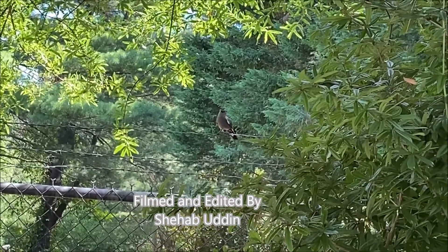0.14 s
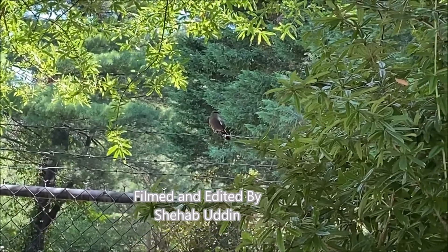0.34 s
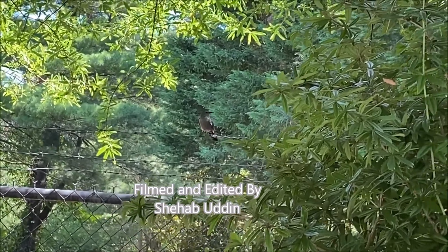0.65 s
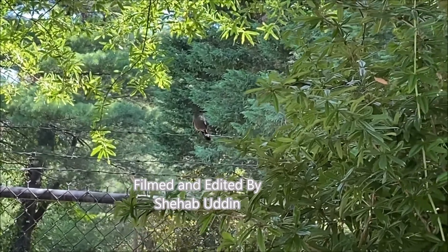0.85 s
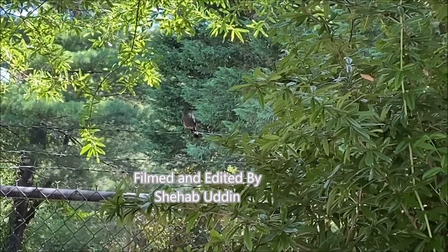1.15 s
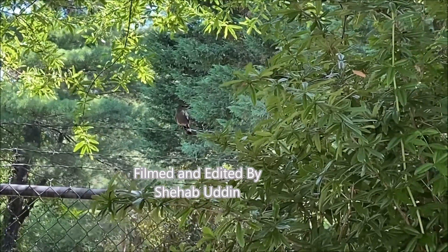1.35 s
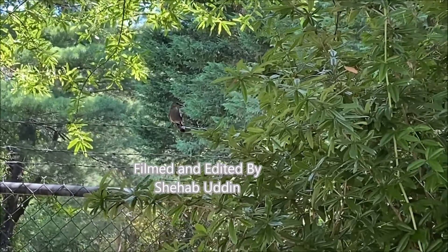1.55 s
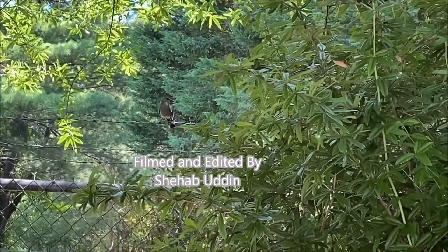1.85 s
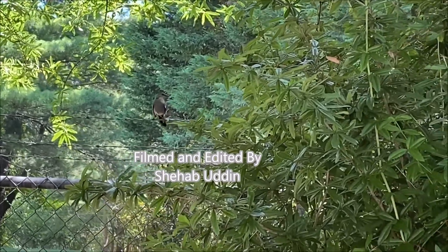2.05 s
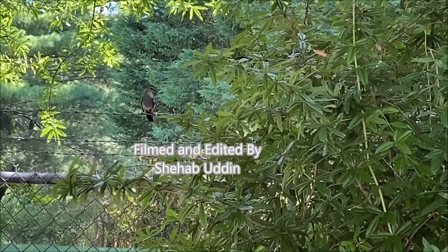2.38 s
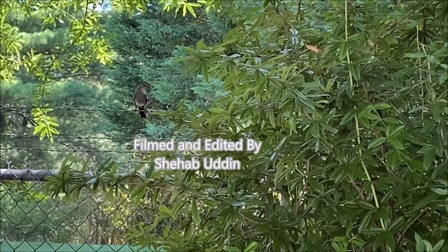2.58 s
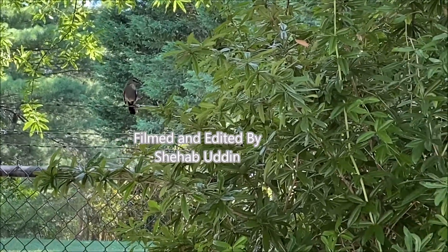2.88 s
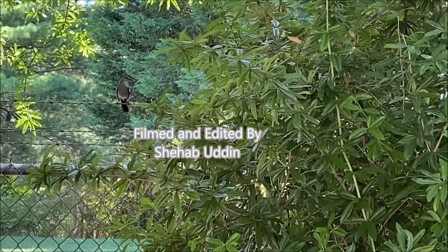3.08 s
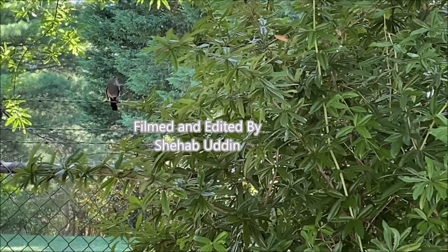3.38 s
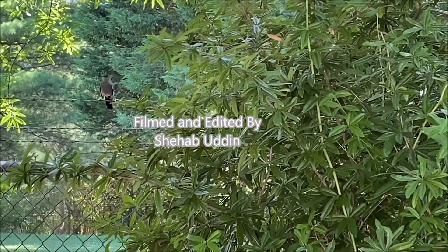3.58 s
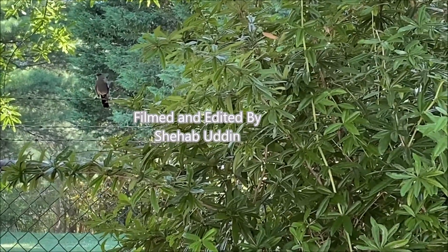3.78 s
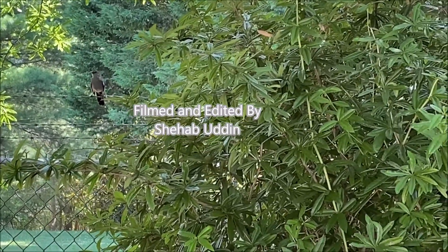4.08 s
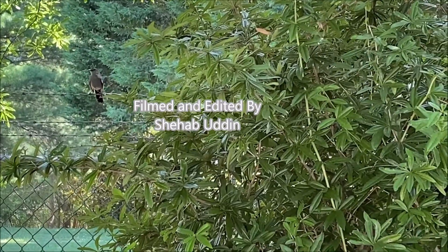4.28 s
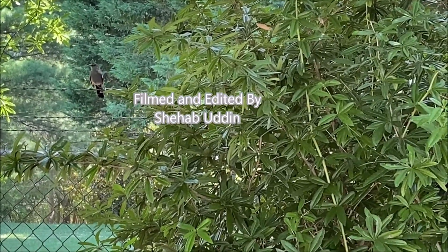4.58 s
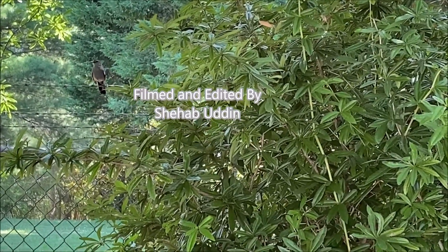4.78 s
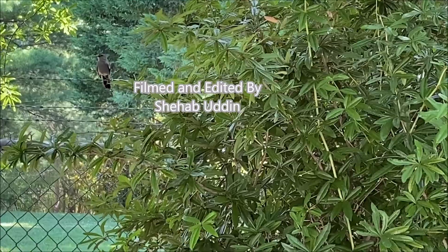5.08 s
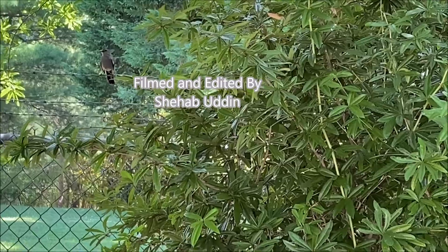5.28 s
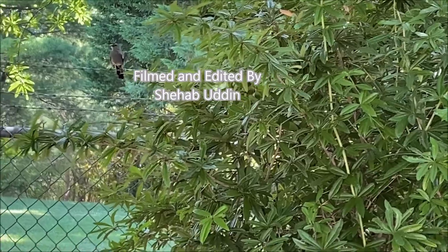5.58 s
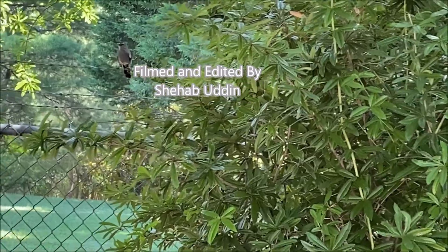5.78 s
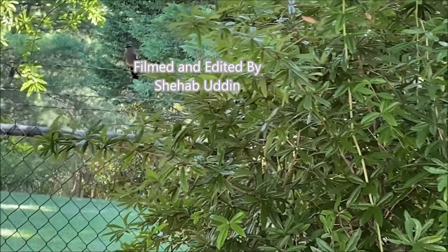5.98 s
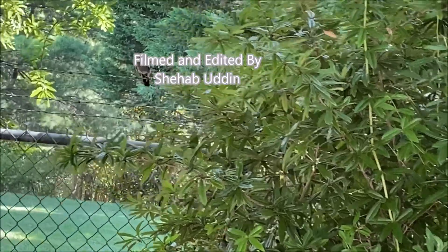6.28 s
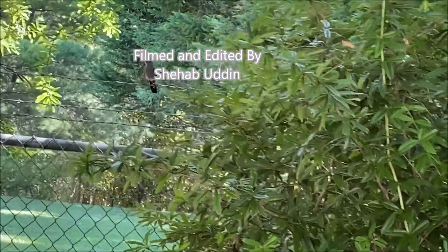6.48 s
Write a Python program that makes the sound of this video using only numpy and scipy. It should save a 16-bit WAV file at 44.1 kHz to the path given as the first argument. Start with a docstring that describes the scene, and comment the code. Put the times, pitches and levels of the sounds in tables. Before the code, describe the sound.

Several small songbirds chirp, whistle and trill in a leafy backyard. Their notes are very brief and slide up or down, scattered at first and more crowded in the second half, with high squeaks and one faint nasal mew. Each call has a slight outdoor echo. Other birds call faintly far off, and a low rumble of distant traffic and a soft hiss continue underneath.

```python
"""A leafy backyard, where songbirds chirp, whistle and trill in quick phrases and one gives a thin nasal mew.
Each note is a nearly pure oscillation of the syrinx, gliding in pitch and roughened by modulation.
Leaves and fence scatter the notes into a short reverberant tail. Other birds call far off, leaves
rustle once and an insect rasps, over the rumble of distant traffic and a soft outdoor hiss.
The sound is received at two microphone ports."""
import sys
import numpy as np
from scipy import signal
from scipy.fft import rfft, irfft
from scipy.io import wavfile
from scipy.ndimage import uniform_filter1d

SR = 44100
rng = np.random.default_rng(int(sys.argv[2]) if len(sys.argv) > 2 else 0)


def pcm_store(signal):
    """Save signal as 16-bit PCM."""
    levels = np.round(np.clip(np.atleast_2d(signal), -1, 1) * 32767)
    wavfile.write(sys.argv[1], SR, levels.astype(np.int16).T)


N = 292824

# Spectra of traffic, hiss and rustle. Each row: frequency in Hz, relative density in dB.
RUMBLE_SPECTRUM = [(20, -22.5), (32, -14), (45, -2.5), (72, 3), (115, -5), (160, -13), (250, -18.5),
                   (400, -25.5), (700, -65)]
HISS_SPECTRUM = [(150, -5), (400, -1), (1000, -1.5), (1800, -3), (3000, -13), (5000, -23.5), (7000, -32.5),
                 (10000, -24.5), (12000, -43), (15500, -44)]
RUSTLE_SPECTRUM = [(1500, -11), (4000, 3.5), (7500, -8), (9000, -9), (11000, -8), (15500, -9)]
# Nearness of the traffic. Each row: time in seconds, relative level in dB.
TRAFFIC_LEVEL = [(0.15, -61), (0.2, -62), (1.59, -60), (1.75, -62), (4.37, -60), (4.82, -58.5),
                 (5.02, -60.5), (6.5, -58.5), (6.55, -57.5)]
# A far engine. Each row: time in seconds, pitch in Hz, level in dB.
ENGINE_DRONE = [(0, 104, -79.5), (4.6, 104, -80), (5.299, 107, -65), (5.901, 110, -62.5),
                (6.64, 110, -63.5)]
# Its first three harmonics. Each entry: relative level in dB.
ENGINE_HARMONICS = [1, -18, -17]

# Direct sound past the leaves, their early scatter, and the tail. Each row: frequency in Hz, gain in dB.
DIRECT_GAIN = [(8500, -2), (10000, -6.5), (15000, -11.5)]
SCATTER_GAIN = [(1500, -28), (3000, -8.5), (5000, -4.5), (8000, -6.5), (10000, -1.5), (11500, -1.5),
                (15000, -6)]
TAIL_GAIN = [(500, -7.5), (2000, -27), (3200, -16.5), (5000, -14.5), (8000, -19.5), (15000, -3.5)]
# Decay of the tail. Each row: frequency in Hz, reverberation time in seconds.
TAIL_T60 = [(500, 0.23), (3000, 0.56), (5000, 0.47), (8000, 0.47), (15000, 0.091)]
# Echoes tip single pitches to one side. Each row: frequency in Hz, left minus right in dB.
ECHO_BALANCE = [(1000, 0), (1300, -3), (1750, 3), (2200, 0), (2700, .5), (3150, -1.2), (4000, 0)]
# Likeness of diffuse noise at the two ports. Each row: frequency in Hz, coherence from 0 to 1.
PORT_COHERENCE = [(60, 0.97), (130, 0.94), (280, .62), (600, 0.2), (1300, 0.083), (2500, 1), (5000, 1),
                  (15000, 0.63)]
# Phase between the ports. Each row: frequency in Hz, lead of the left in radians.
PORT_LEAD = [(20, 0), (2100, 0), (3150, .55), (4100, .1), (7000, -.1), (9000, -3.1), (11200, -6.3),
             (13150, -9.4), (15200, -12.6)]
# Microphone colour on overtones and rasp, with a lift near 13 kHz. Each row: frequency in Hz, gain in dB.
TREBLE_COLOUR = [(1500, -4.5), (3600, 0.5), (5300, 1), (8000, -2.5), (9500, -5.5), (11300, -9.5),
                 (12800, 3.5), (14500, -4), (15800, -2.5)]

# Bird levels are relative, taken before the yard colours them.
# Far chirps. Each row: middle in seconds, length in seconds, pitch in Hz, level in dB.
FAR_CHIRPS = [(0.662, .19, 3980, -79), (3.076, 0.27, 3670, -78), (3.453, 0.18, 3590, -79.5),
              (4.369, 0.09, 3950, -80), (4.549, 0.32, 4240, -74.5), (4.957, 0.13, 4240, -80),
              (5.127, 0.32, 3510, -78), (6.488, 0.11, 4400, -78), (6.55, .12, 3800, -72.5)]
# Far low hoots. Each row: middle in seconds, length in seconds, level in dB.
FAR_HOOTS = [(2.572, .12, -72.5), (2.778, 0.3, -70), (3.037, .27, -67.5)]
# One long wavering whistle. Each row: time in seconds, pitch in Hz, level in dB.
FAR_WHISTLE_PATH = [(5.1, 1340, -81), (5.17, 1452, -72), (5.25, 1540, -74), (5.31, 1400, -78),
                    (5.391, 1430, -78), (5.5, 1530, -77.5), (5.62, 1550, -79), (5.759, 1564, -97)]
# Resonances of the mewing throat. Each row: frequency in Hz, gain in dB.
MEW_FORMANTS = [(1000, -32), (2000, 0.5), (3050, 2.5), (4050, -7), (5000, 2.5), (6100, -9.5), (7200, -19),
                (12000, -32)]
# Prominence of the octave. Each row: pitch in Hz, level in dB added to the overtone setting.
OCTAVE_BOOST = [(1650, 5.5), (2100, -8.5), (2600, -0.5), (2940, 10.5), (3150, -1.5), (4200, 11), (5500, 4),
                (8000, 3)]
# Whistled notes, and one faint fading echo near 2650 Hz at the start.
# Each row: start and length in seconds, first, middle and last pitch in Hz,
# level in dB, attack and release in seconds, overtones in dB, rasp from 0 to 1.
WHISTLES_AND_ECHO = [(0.0, 0.01, 2600, 2585, 2550, -36, 0.0009, .016, -26, 0.86),
                     (0.012, 0.31, 2660, 2650, 2637, -69, .002, 0.46, -31, .27),
                     (.049, .051, 1710, 1853, 1750, -40.5, 0.026, .02, -35, .1),
                     (.093, .13, 1774, 1657, 1613, -53.5, 0.0018, 0.018, -33.5, 0.38),
                     (.228, 0.049, 7100, 7870, 8210, -78, 0.011, .01, -30.5, 0.12),
                     (0.752, 0.036, 2900, 2480, 2198, -54, 0.0024, 0.0039, -1.5, 1),
                     (.755, 0.031, 8270, 5950, 4555, -38.5, 0.014, 0.0092, -25, 1),
                     (1.187, 0.061, 1737, 1646, 1520, -52, 0.03, 0.011, -29, 0.17),
                     (1.55, .025, 3800, 4070, 4930, -53.5, .009, 0.0025, -28, .44),
                     (1.561, 0.029, 3170, 2900, 1620, -43, .018, 0.0048, -29, .7),
                     (2.61, 0.043, 7300, 8000, 8440, -71, .016, 0.017, -33, 0.14),
                     (2.738, 0.055, 1670, 1848, 1570, -45.5, 0.026, 0.04, -36.5, 0.35),
                     (2.957, 0.048, 1877, 1832, 1803, -43.5, .002, 0.037, -26.5, 0.19),
                     (3.491, 0.044, 4170, 4120, 3960, -62, 0.047, .003, -3, 0.74),
                     (3.529, 0.053, 2810, 2957, 2500, -42.5, 0.018, 0.017, -26.5, 0.14),
                     (3.775, 0.061, 4480, 4354, 4140, -64.5, 0.037, .003, -12, 0.89),
                     (3.819, 0.053, 2775, 2951, 2820, -41, .02, 0.024, -25.5, 0.08),
                     (3.974, .062, 4080, 3850, 3290, -54.5, 0.014, .04, -21, .7),
                     (4.382, .069, 2785, 1957, 1923, -49, 0.014, 0.014, -33.5, 0.27),
                     (4.454, 0.051, 2120, 2230, 2380, -51, 0.059, .001, -22, .25),
                     (4.497, 0.024, 2320, 2614, 2200, -42.5, 0.0021, 0.006, -28, 0.38),
                     (4.519, 0.034, 3360, 3063, 2520, -43.5, .014, 0.0056, -25, .54),
                     (4.557, 0.042, 1857, 2098, 1930, -41, 0.014, 0.023, -33, 0.18),
                     (5.476, .011, 5020, 5820, 6740, -40.5, .006, .001, -24, .55),
                     (5.566, .042, 7750, 8005, 7940, -41, 0.018, 0.0089, -29, 0.096),
                     (5.797, 0.027, 2640, 2514, 2480, -49.5, 0.012, 0.0046, -27.5, .15),
                     (5.903, .028, 2116, 1812, 1550, -39.5, 0.0017, 0.024, -37, .11),
                     (5.943, .063, 2183, 2196, 2120, -39.5, 0.0027, 0.011, -35, 0.05),
                     (6.131, 0.045, 3230, 3130, 3167, -44.5, .014, 0.0012, -19.5, 0.7),
                     (6.169, .061, 3174, 3138, 3154, -37.5, .007, 0.0085, -28.5, 0.19)]
# Trills. Each row: as for a whistle, then pitch swing in Hz, swings per second, pulsing from 0 to 1.
TRILL_NOTES = [(1.242, 0.09, 1600, 1630, 2500, -59, .002, 0.002, -20.5, 0.89, 250, 84, 0.43),
               (1.232, 0.0955, 3000, 2750, 2820, -46.5, 0.072, 0.045, -29.5, .73, 300, 84, .36),
               (2.8, 0.0544, 2380, 2520, 2210, -40.5, 0.0053, 0.012, -38.5, 0.082, 120, 59, .026),
               (2.853, .11, 2110, 2020, 1870, -53, .02, .002, -32, .55, 260, 84.6, .64),
               (5.812, .063, 2900, 2820, 2350, -39.5, .014, 0.012, -39.5, 0.15, 366, 92.8, 0.21)]
# A two-voiced phrase: a rising squeal, a low dip under it, then a short whistle.
# Each row: as for a whistle, with the start counted from the squeal.
PHRASE_NOTES = [(-.026, .03, 4250, 4735, 5070, -53, 0.036, .001, -14, 0.69),
                (0, 0.0307, 5010, 5810, 6400, -41.5, 0.0056, 0.021, -22.5, 0.87),
                (.011, 0.052, 3965, 2620, 2870, -44.5, 0.03, .012, -20, 0.51),
                (.07, .035, 3477, 3120, 3420, -45, 0.0096, 0.016, -22.5, .38)]
# Each singing of that phrase. Each row: time in seconds, gain in dB.
PHRASE_TIMES = [(2.121, -1), (2.366, 1)]
# High diving chirps. Each row: start and length in seconds, pitch before, after the dive and after the
# climb in Hz, dive, hold and climb in seconds, level, mid-hold change and overtones in dB, rasp 0 to 1.
SWOOP_NOTES = [(0.682, 0.086, 8500, 6260, 7870, 0.031, 0.00085, 0.02, -42, -3, -24, 0.67),
               (1.349, 0.12, 7600, 4676, 7750, .018, .075, .023, -40.5, -12, -18.5, 0.3),
               (5.246, 0.044, 9400, 8230, 8340, 0.014, 0.015, 0.0091, -40.5, -3, -33, 0.46),
               (5.287, 0.014, 8450, 6635, 8500, .008, 0.0013, 0.0051, -36.5, -1.5, -23.5, 0.17),
               (5.375, .07, 4450, 3485, 4317, .021, 0.0064, 0.015, -46.5, -5, -14.5, .17),
               (5.484, 0.11, 6450, 5507, 7790, 0.0045, .049, .024, -41.5, 2, -18, .25)]
# Arched squeaks. Each row: start and length in seconds, first, top and last pitch in Hz,
# place of the top from 0 to 1, level, octave and overtones in dB, rasp from 0 to 1.
SQUEAK_NOTES = [(3.139, 0.08, 1166, 1301, 1050, 0.39, -60, 11.6, -20, 0.09),
                (3.604, 0.064, 2560, 3556, 2853, 0.3, -47, 4.3, -5, 0.51),
                (3.961, 0.085, 3276, 3763, 2964, 0.39, -56, 16.3, 1, 0.31),
                (6.079, .06, 2253, 3370, 3150, .47, -49.5, 12.6, -2, .46)]


def amp(db):
    """Amplitude ratio of a level in decibels."""
    return 10 ** (np.asarray(db) / 20)


def unit(x):
    """Normalisation to an rms of 1."""
    return x / np.sqrt(np.mean(x ** 2) + 1e-20)


def at_hz(points, hz):
    """Interpolation on a logarithmic frequency axis."""
    f, value = np.transpose(points)
    return np.interp(np.log(hz + 1), np.log(f + 1), value)


def add(mix, s, sound):
    """Superposition: a sound joins the mix at s seconds."""
    part = mix[max(round(s * SR), 0):][:len(sound)]
    part += sound[:len(part)]


def wander(size, hz):
    """Random fluctuation: low-pass noise of rms near 1 and bandwidth hz."""
    f = np.fft.rfftfreq(size + SR, 1 / SR)
    return unit(irfft(rfft(rng.standard_normal(size + SR)) * np.exp(-(f / hz) ** 2)))[:size]


def narrowband(hz, width_hz):
    """Random quadrature modulation spreads the pitch curve hz into a band of noise."""
    phase = 2 * np.pi * np.cumsum(hz) / SR
    return wander(len(hz), width_hz) * np.cos(phase) + wander(len(hz), width_hz) * np.sin(phase)


def envelope(length, attack_s, release_s, ends_db=-16):
    """Amplitude envelope in dB: attack, hold and release."""
    t = np.arange(int(length * SR)) / SR
    attack = np.maximum(1 - t / attack_s, 0) ** 2
    release = np.maximum(1 - (length - t) / release_s, 0) ** 2
    return ends_db * (attack + release)


def ease(u):
    """A raised-cosine step from 0 to 1."""
    return np.sin(np.pi / 2 * np.clip(u, 0, 1)) ** 2


def slur(length, start_hz, middle_hz, end_hz, bend_power=2.3):
    """Frequency glide: pitch bends onto a note, drifts if it is heading one way, and bends off."""
    u = np.linspace(-1, 1, int(length * SR))
    drift = np.median([middle_hz - start_hz, 0, end_hz - middle_hz])
    bend = np.where(u < 0, start_hz + drift, end_hz - drift) - middle_hz
    return middle_hz + drift * u + bend * abs(u) ** bend_power


def diffuse(spectrum):
    """A diffuse field arrives from all around, so its coherence at two ports depends on frequency."""
    hz = np.fft.rfftfreq(N, 1 / SR)
    common, apart = rfft(rng.standard_normal((2, N))) * amp(at_hz(spectrum, hz))
    coherence = np.clip(at_hz(PORT_COHERENCE, hz), -1, 1)
    mid, side = common * np.sqrt(1 + coherence), apart * np.sqrt(1 - coherence)
    return unit(irfft([mid + side, mid - side], N))


def background(engine_waver=0.01, traffic_gain_db=0.5, hiss_db=-71.5):
    """Diffuse traffic rumble and open-air hiss surround the harmonic series of one engine."""
    t = np.arange(N) / SR
    rumble = diffuse(RUMBLE_SPECTRUM) * amp(traffic_gain_db + np.interp(t, *np.transpose(TRAFFIC_LEVEL)))
    s, hz, db = np.transpose(ENGINE_DRONE)
    pitch = np.interp(t, s, hz) * (1 + engine_waver * wander(N, 8))
    phase = 2 * np.pi * np.cumsum(pitch) / SR
    engine = unit(sum(amp(level) * np.sin(k * phase) for k, level in enumerate(ENGINE_HARMONICS, 1)))
    return rumble + engine * amp(np.interp(t, s, db)) + diffuse(HISS_SPECTRUM) * amp(hiss_db)


def insect(hz=10300, width_hz=450, db=-96.5, depth=.75, strokes_per_s=4.35, peak_s=.065):
    """Stridulation: even strokes modulate the amplitude of a faint, high band of noise."""
    strokes = 1 + depth * np.cos(2 * np.pi * strokes_per_s * (np.arange(N) / SR - peak_s))
    return amp(db) * unit(narrowband(np.full(N, hz), width_hz) * strokes)


def rustle(start_s=4.92, length=0.34, db=-82.5, attack_s=0.046, release_s=0.12):
    """Friction noise: leaves brush softly for a moment."""
    level = np.zeros(N)
    add(level, start_s, amp(db + envelope(length, attack_s, release_s)))
    return level * diffuse(RUSTLE_SPECTRUM)


def yard(x, tail_delay_s=.008, scatter_decay_s=.014):
    """Scattering: leaves block and deflect the shortest waves; trees and fence add reverberation."""
    t = np.arange(SR) / SR
    hz, frame_s, bands = signal.stft(rng.standard_normal(SR) * (t > tail_delay_s), SR, nperseg=256)
    t60 = at_hz(TAIL_T60, hz)[:, None]
    decay = np.exp(-np.log(1000) * frame_s / t60)
    equal_energy = np.sqrt(2 * np.log(1000) / (t60 * SR))
    bands *= amp(at_hz(TAIL_GAIN, hz)[:, None]) * decay * equal_energy
    tail = signal.istft(bands, SR, nperseg=256)[1][:SR]
    leaves = rng.standard_normal(SR) * np.exp(-t / scatter_decay_s)
    hz = np.fft.rfftfreq(N + SR, 1 / SR)
    scattered = rfft(leaves / np.linalg.norm(leaves), N + SR) * amp(at_hz(SCATTER_GAIN, hz))
    response = amp(at_hz(DIRECT_GAIN, hz)) + scattered + rfft(tail, N + SR)
    return irfft(rfft(x, N + SR) * response, N + SR)[:N]


def far_call(length, hz, width_hz, db):
    """Scattering randomises phase, leaving a soft swell of noise around one pitch."""
    size = int(length * SR)
    return amp(db) * narrowband(np.full(size, hz), width_hz) * np.hanning(size)


def far_birds(chirp_width_hz=870, hoot_hz=609, hoot_width_hz=180, whistle_width_hz=35):
    """Distant chirps, hoots and one long whistle arrive only as scattered sound."""
    out = np.zeros(N)
    for s, length, hz, db in FAR_CHIRPS:
        add(out, s - length / 2, far_call(length, hz, chirp_width_hz, db))
    for s, length, db in FAR_HOOTS:
        add(out, s - length / 2, far_call(length, hoot_hz, hoot_width_hz, db))
    s, pitch, level = np.transpose(FAR_WHISTLE_PATH)
    t = np.arange(s[0], s[-1], 1 / SR)
    whistle = narrowband(np.interp(t, s, pitch), whistle_width_hz) * amp(np.interp(t, s, level))
    add(out, s[0], whistle * signal.windows.tukey(len(t), .1))
    return out


def mew(start_s=4.55, length=.245, db=-66.5, jitter=0.0055):
    """Source and filter: a harmonic series arches in pitch through the resonances of the throat."""
    pitch = slur(length, start_hz=880, middle_hz=1030, end_hz=870)
    hz = pitch * (1 + jitter * wander(len(pitch), 200))
    phase = 2 * np.pi * np.cumsum(hz) / SR
    voice = sum(amp(at_hz(MEW_FORMANTS, k * hz)) * np.sin(k * phase) for k in range(1, 15))
    out = np.zeros(N)
    add(out, start_s, unit(voice) * amp(db + envelope(length, attack_s=.025, release_s=.1)))
    return out


def syrinx(hz, level_db, octave_db, upper_db, rasp, jitter=0.0054, flutter_db=1.5, edge_s=0.0024,
           upper_trim_db=-2.0, shake_rad=0.31, shake_hz=700, air_db=-14, air_width_hz=3800):
    """The syrinx oscillates almost as a sine; rasp modulates its phase and adds noise sidebands."""
    size = len(hz)
    t = np.arange(size) / SR
    hz = hz * (1 + jitter * wander(size, 200))
    shake = shake_rad * rasp * wander(size, shake_hz)  # smears each overtone more than the last
    phase = 2 * np.pi * np.cumsum(hz) / SR + shake
    overtones = amp(octave_db) * np.sin(2 * phase) * (2 * hz < SR / 2)
    for k in range(3, 12):
        overtones += amp(upper_db + upper_trim_db) * np.sin(k * phase) * (k * hz < SR / 2)
    air_gain = amp(air_db) * rasp ** 2 * np.hypot(1, amp(octave_db))
    air = air_gain * wander(size, air_width_hz) * np.sin(phase)
    colour = amp(at_hz(TREBLE_COLOUR, np.fft.rfftfreq(size, 1 / SR)))
    tone = np.sin(phase) + irfft(rfft(overtones + air) * colour, size)
    edges = np.sin(np.pi / 2 * np.clip(np.minimum(t, t[::-1]) / edge_s, 0, 1))
    return np.sqrt(2) * tone * amp(level_db + flutter_db * wander(size, 160)) * edges


def fizz(chirps, db=-33, corner_hz=9000, follow_s=0.0018):
    """Modulated noise: loud high chirps carry a hoarse fizz that follows their envelope."""
    treble = signal.sosfilt(signal.butter(2, 3500, "high", fs=SR, output="sos"), chirps)
    level = np.sqrt(np.abs(uniform_filter1d(treble ** 2, int(follow_s * SR))))
    hz = np.fft.rfftfreq(N, 1 / SR)
    colour = amp(at_hz(TREBLE_COLOUR, hz)) * hz ** 2 / (hz ** 2 + corner_hz ** 2)
    noise = irfft(rfft(rng.standard_normal(N)) * colour, N)
    return amp(db) * level * unit(noise)


def squeak(length, start_hz, top_hz, end_hz, top_at, db, octave_db, upper_db, rasp, bend_power=1.8):
    """Resonance: a throat tuned to the octave favours the second harmonic over one arch of pitch."""
    u = np.interp(np.linspace(0, 1, int(length * SR)), [0, top_at, 1], [-1, 0, 1])
    hz = top_hz + (np.where(u < 0, start_hz, end_hz) - top_hz) * abs(u) ** bend_power
    level_db = db + envelope(length, attack_s=0.034, release_s=0.036)
    return syrinx(hz, level_db, octave_db, upper_db, rasp)


def swoop(length, from_hz, low_hz, to_hz, dive_s, hold_s, climb_s, db, slack_db, upper_db, rasp,
          sag_hz_per_s=7500, lowest_at=.68, db_per_octave=-10.5, warble_hz=450, warbles_per_s=130):
    """A frequency sweep that swells as it dives, sags as it holds and thins as it climbs."""
    t = np.arange(int(length * SR)) / SR
    held = np.clip((t - dive_s) / hold_s, 0, 1)
    sag = sag_hz_per_s * hold_s * np.sin(np.pi / 2 * held / lowest_at)
    hz = from_hz + (low_hz - from_hz) * ease(t / dive_s) - sag
    hz += (to_hz - hz) * ease((t - dive_s - hold_s) / climb_s)
    slack = abs(np.sin(np.pi * held ** 1.5)) ** .6  # a broad arch, peaking late in the hold
    level_db = db + envelope(length, dive_s, release_s=0.009) + slack_db * slack
    level_db += db_per_octave * np.log2(hz / low_hz)
    warble = warble_hz * rasp ** 2 * np.sin(2 * np.pi * warbles_per_s * t)
    return syrinx(hz + warble, level_db, upper_db + at_hz(OCTAVE_BOOST, low_hz), upper_db, rasp)


def note(length, start_hz, middle_hz, end_hz, db, attack_s, release_s, upper_db, rasp,
         swing_hz=0, swings_per_s=0, pulsing=0):
    """A slurred tone; frequency and amplitude modulation make a trill, loudest on each downsweep."""
    hz = slur(length, start_hz, middle_hz, end_hz)
    swing = 2 * np.pi * swings_per_s * np.arange(len(hz)) / SR
    gate = (1 - np.clip(pulsing, 0, 1) * (1 + np.sin(swing)) / 2) ** 2
    level_db = db + envelope(length, attack_s, release_s)
    octave_db = upper_db + at_hz(OCTAVE_BOOST, middle_hz)
    return syrinx(hz - swing_hz * np.cos(swing), level_db, octave_db, upper_db, rasp) * gate / gate.mean()


def song():
    """Superposition of the near birds' whistles, trills, swoops, squeaks and phrases, and one echo."""
    out = np.zeros(N)
    voices = (note, WHISTLES_AND_ECHO), (note, TRILL_NOTES), (swoop, SWOOP_NOTES), (squeak, SQUEAK_NOTES)
    for voice, rows in voices:
        for s, *shape in rows:
            add(out, s, voice(*shape))
    for s, db in PHRASE_TIMES:
        for delay, *shape in PHRASE_NOTES:
            add(out, s + delay, amp(db) * note(*shape))
    return out


def scene(song_gain_db=-0.51, far_gain_db=1.0):
    """Birdsong propagates through the yard and adds to the insect, the rustle and the background."""
    near = amp(song_gain_db) * song()
    birds = near + fizz(near) + mew() + amp(far_gain_db) * far_birds()
    balance_db = at_hz(ECHO_BALANCE, np.fft.rfftfreq(N, 1 / SR))
    stereo_birds = irfft(rfft(yard(birds)) * amp([balance_db / 2, -balance_db / 2]), N)
    return stereo_birds + insect() + rustle() + background()


def record(dry, cutoff_hz=15850):
    """A phase difference parts the two ports in the treble; a low-pass filter limits the band."""
    lead = at_hz(PORT_LEAD, np.fft.rfftfreq(N, 1 / SR))
    ports = irfft(rfft(dry) * np.exp(.5j * np.array([lead, -lead])), N)
    lowpass = signal.firwin(511, cutoff_hz, window=("kaiser", 9), fs=SR)
    return signal.oaconvolve(ports, lowpass[None], "same")


dry = scene()
out = record(dry)
pcm_store(out)
```